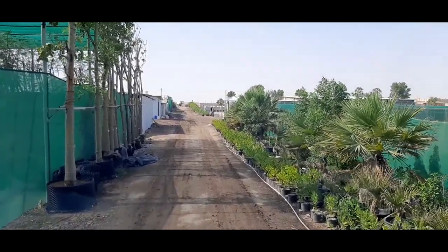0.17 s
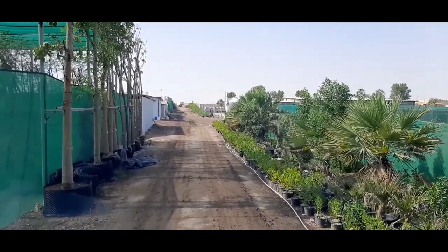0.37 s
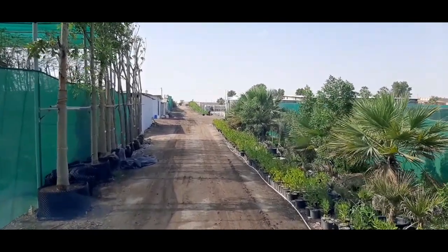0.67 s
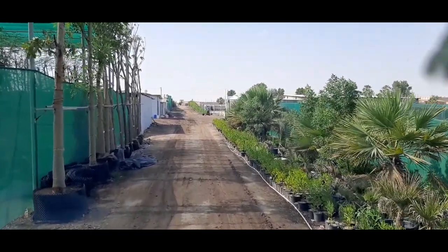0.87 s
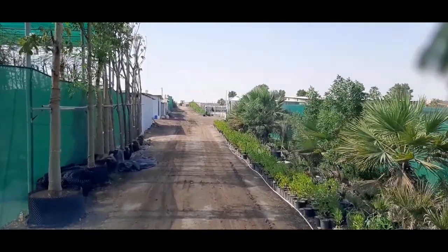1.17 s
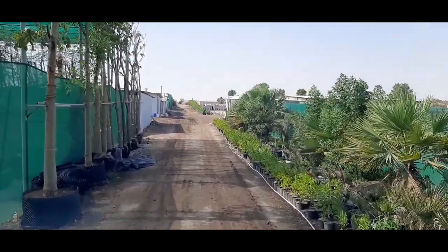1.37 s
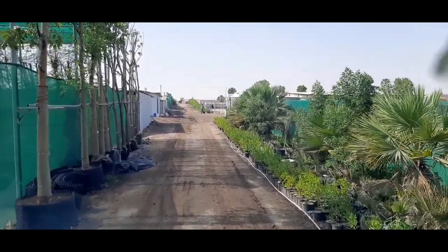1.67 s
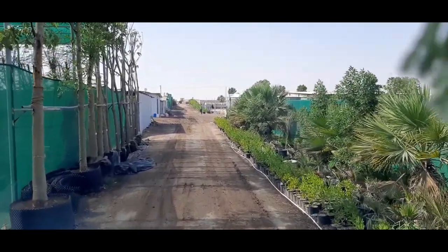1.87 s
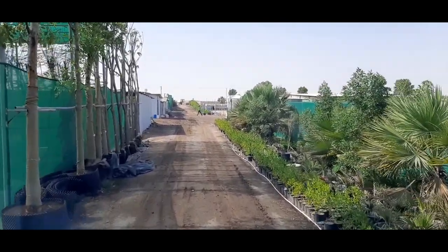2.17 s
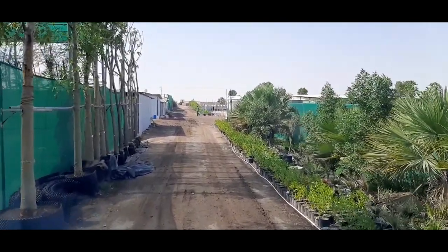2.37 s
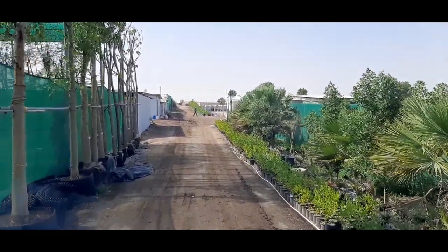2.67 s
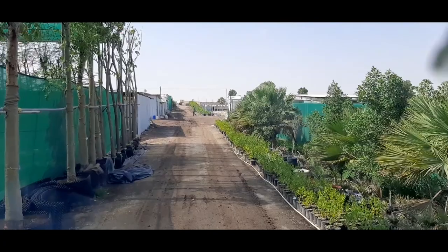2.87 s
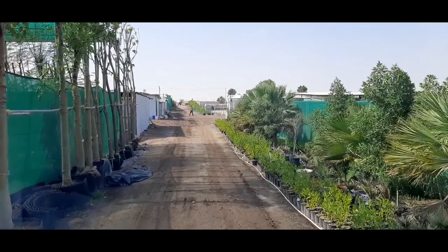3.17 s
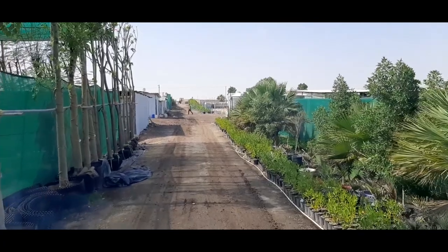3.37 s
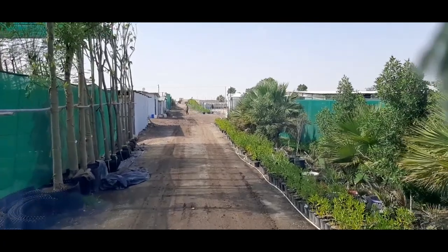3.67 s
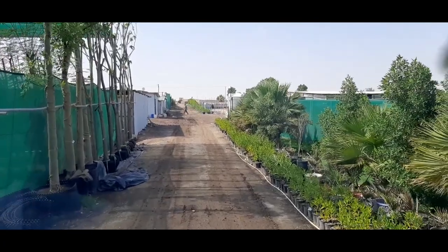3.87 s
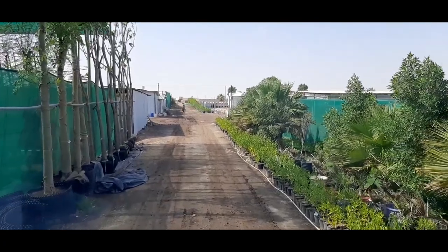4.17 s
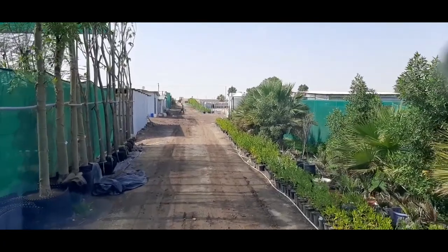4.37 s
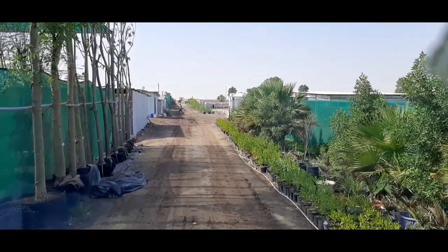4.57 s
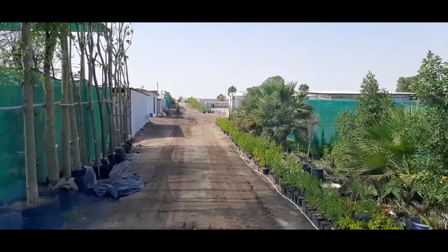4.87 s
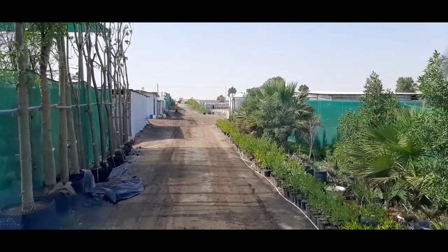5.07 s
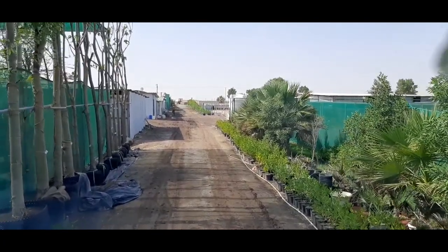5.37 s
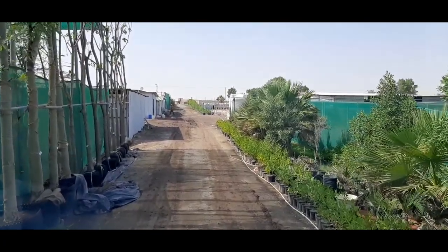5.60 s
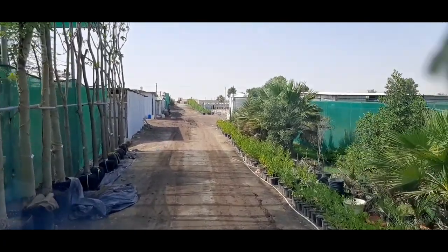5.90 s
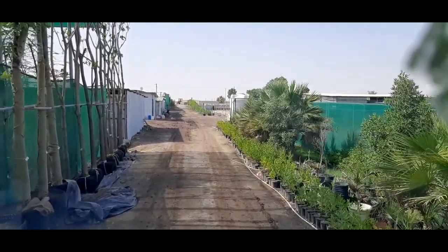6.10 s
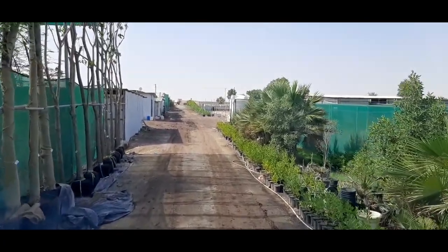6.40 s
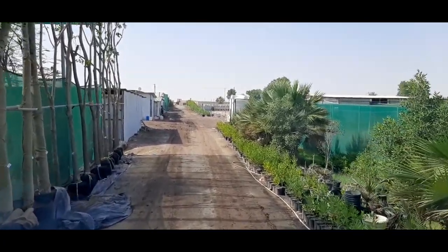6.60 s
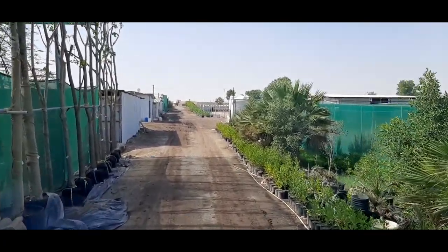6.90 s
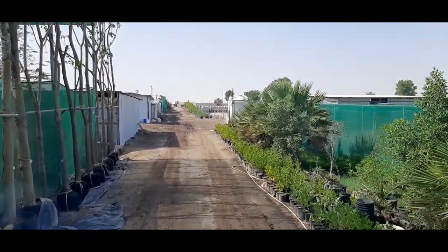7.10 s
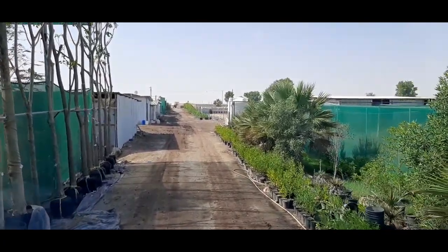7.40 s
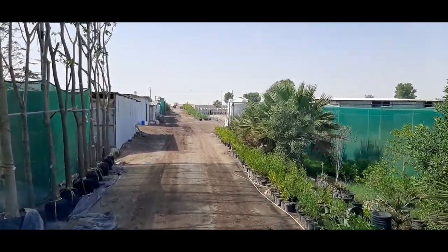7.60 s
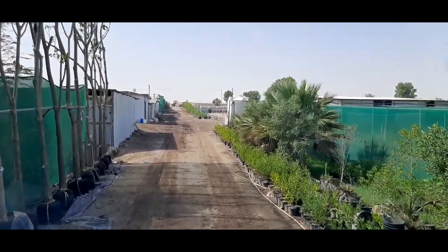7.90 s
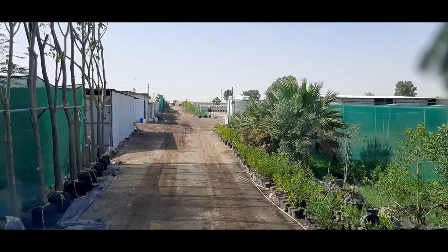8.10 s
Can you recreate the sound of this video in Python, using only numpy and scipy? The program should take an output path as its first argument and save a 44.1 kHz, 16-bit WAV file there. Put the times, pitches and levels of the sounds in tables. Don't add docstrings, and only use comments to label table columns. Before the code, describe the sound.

Heard in stereo from inside the cab of a heavy diesel truck moving slowly along a rough dirt track on a plant farm. A thick, humming engine drone of many steady low tones runs throughout, over boomy tyre rumble and a muffled combustion roar. From 0 to 2 s the engine coasts, wavering slightly, with a small rut at the start, a plastic tap at 0.4 s and light trim chatter leaning right. At about 2.0 s a big bump throws the load: rapid, hard dull thuds with hollow plastic taps and bright metal tinks. Rattling continues, and a second cluster of knocks lands near 3.6 s, with plastic taps just before 4 s. Around 4.7 s the engine begins pulling and its pitch rises a little. After 5 s the rattles are thinner, with faint knocks near 6 and 6.9 s, and the drone climbs gradually to the end at about 8 s.

```python
import sys
import numpy as np
from scipy import signal
from scipy.io import wavfile
from scipy.ndimage import uniform_filter1d

SR = 44100
rng = np.random.default_rng(int(sys.argv[2]) if len(sys.argv) > 2 else 0)


def voltage_ratio(decibels):
    exponent = np.asarray(decibels, float) / 20
    return 10 ** exponent


def output_pcm(signal):
    pcm = np.clip(np.atleast_2d(signal).T, -1, 1) * 32767
    wavfile.write(sys.argv[1], SR, np.round(pcm).astype(np.int16))


N = 363825
T = np.arange(N) / SR
CALM_DB = -58.5

# pitch_hz, likeness (0-1), left_lead (radians), left_over_right_db
PORTS = [(45, .93, -1.05, 3.3), (85, .9, -.4, 3.8), (110, .96, -.75, 2.6), (190, .95, -.45, .8),
         (300, .35, -.5, -1), (560, .4, .2, 2.4), (800, .4, 2.2, 1.5), (1200, .5, 3.3, .6),
         (2000, .4, 2.0, 1.8), (3500, .35, 1.6, .5), (9000, .3, 1.6, -4.9), (15000, .3, 1.6, -5.1)]
# pitch_ratio (times the main ring), level_db
BOX = [(.6, -10), (1, 0), (1.1, -9), (1.36, -2), (1.58, -6), (2.15, -8), (2.7, -15)]


def evened(x):
    return x / np.sqrt(np.mean(x ** 2) + 1e-20)


def read(points, hz, axis=1):
    columns = np.transpose(points)
    return np.interp(np.log(hz + 1), np.log(columns[0] + 1), columns[axis])


def curve(rows, axis=1):
    columns = np.transpose(rows)
    return np.interp(T, columns[0], columns[axis])


def drift(top_hz):
    t = T[::256]
    rates = np.geomspace(top_hz / 10, top_hz, num=16)[:, None]
    waves = np.sin(2 * np.pi * (rates * t + rng.random((16, 1))))
    return np.interp(T, t, evened(waves.sum(0)))


def ports(hz):
    half_level = voltage_ratio(read(PORTS, hz, axis=3) / 2)
    half_turn = np.exp(.5j * read(PORTS, hz, axis=2))
    left = half_level * half_turn
    return np.array([left, 1 / left])


def noise(spectrum, patchy_db, size, modes=()):
    frames, hz = 4 * N // size + 5, np.fft.rfftfreq(size, 1 / SR)
    a, b, c, d, patches = rng.standard_normal((frames, len(hz), 5)).T
    patches = uniform_filter1d(patches, size=9, axis=0)
    patches = evened(uniform_filter1d(patches, size=9, axis=1))
    same = np.clip(read(PORTS, hz), 0, 1)[:, None]
    left = a + 1j * b
    right = same * left + np.sqrt(1 - same ** 2) * (c + 1j * d)
    z = np.array([left, right]) * ports(hz)[:, :, None]
    colour_db = read(spectrum, hz)
    for mode_hz, width_hz, db in modes:
        colour_db = colour_db + db / (1 + (2 * (hz - mode_hz) / width_hz) ** 2)
    z *= voltage_ratio(colour_db[:, None] + patchy_db * patches)
    out = signal.istft(z, nperseg=size, noverlap=3 * size // 4)[1][:, :N]
    return out / np.sqrt(np.mean(out.mean(0) ** 2))


def hits(rows, ratios, detune, crack):
    out, t = np.zeros((2, N + SR)), np.arange(SR // 5) / SR
    ratio, mode_db = np.transpose(ratios)[:, :, None]
    draws = rng.uniform(-1.47, 1, (len(rows), 3, len(ratios), 1))
    for (start_s, db, hz, t60, *pan), (tune, *turn) in zip(rows, draws):
        modes_hz = hz * ratio * (1 + detune * tune * (ratio != 1))
        waves = np.sin(2 * np.pi * (modes_hz * t + .1 * np.array(turn)))
        ring = (voltage_ratio(mode_db) * waves).sum(1)
        b, a = signal.butter(2, [hz / 1.6, min(hz * 1.5, 15000)], "band", fs=SR)
        burst = evened(signal.lfilter(b, a, rng.standard_normal((2, len(t)))))
        burst = burst * voltage_ratio(-60 * 0.17 * t / t60)
        fade = voltage_ratio(db - 60 * t / t60) * np.minimum(t / .0005, 1)
        blow = (ring + crack * burst) * fade
        at = round(start_s * SR)
        out[:, at:at + len(t)] += blow * voltage_ratio([[sum(pan) / 2], [-sum(pan) / 2]])
    return out[:, :N]


def ruts():
    # middle_s, lift_db, half_length_s
    deep = [
        (0.0, 4.5, 0.098),
        (1.946, 5.5, 0.2),
        (3.71, 3, 0.18),
        (4.76, 2, .25),
        (8.25, -6, 0.18),
    ]
    return sum(db * np.exp(-((T - middle_s) / half_s) ** 2) for middle_s, db, half_s in deep)


def shaking():
    # start_s, length_s, level_db
    jolts = [(.0, 0.28, -53.5), (0.28, 0.046, -54), (0.547, 0.29, -54.5), (0.861, 0.025, -52.5),
             (0.977, 0.15, -51.5), (1.223, 0.17, -49), (1.448, 0.61, -51), (1.95, 0.062, -48),
             (2.075, 0.017, -42), (2.217, 0.16, -50.5), (2.414, 0.054, -50.5), (2.5, 0.19, -52),
             (2.77, 0.064, -50.5), (2.92, 0.13, -50.5), (3.154, 0.12, -51), (3.351, 0.55, -50.5),
             (3.826, 0.39, -50), (4.27, 0.088, -51), (4.392, 0.26, -50), (4.694, .04, -53),
             (4.79, 0.031, -52.5), (4.866, 0.26, -50.5), (5.29, 0.19, -55), (5.67, 0.06, -50),
             (5.88, 0.13, -51), (6.212, 0.15, -53), (6.436, 0.11, -52), (6.643, 0.14, -53.5),
             (7.25, 0.16, -52.5), (7.68, 0.42, -53)]
    start, length, db = np.transpose(jolts)[:, :, None]
    rise_s, fall_s = .01, 0.024
    t = T[::64]
    rise = np.clip((t - start) / rise_s + .5, 0, 1)
    fall = np.exp(-np.maximum(t - start - length, 0) / fall_s)
    return np.interp(T, t, CALM_DB + ((db - CALM_DB) * rise * fall).max(0))


def cycle():
    # time_s, firing_hz
    speed = [(0, 44.8), (.5, 43.9), (.9, 43.5), (1.2, 44.1), (1.55, 43.15), (2.05, 44.6), (2.5, 44.0),
             (3.0, 44.4), (3.5, 43.45), (3.8, 44.2), (4.2, 44.15), (4.95, 46.35), (5.2, 46.2), (5.5, 45.65),
             (6.0, 46.05), (6.5, 47.45), (6.8, 47.4), (7.35, 49.7), (7.8, 49.7), (8.25, 51.4)]
    firing_hz = uniform_filter1d(curve(speed), size=SR // 4, mode="nearest")
    firing_hz = firing_hz * (1 + .0004 * drift(4.0))
    return 2 * np.pi * np.cumsum(firing_hz) / SR / 6


def drone(angle):
    # time_s, load (0 coasting, 1 pulling, 2 pulling faster), throttle_effort_db
    driving = [(0, .1, 1), (.6, .1, 1), (.95, .1, -7), (1.3, .1, -2), (1.75, .1, -10), (2.15, .1, 1.5),
               (2.55, .1, 0), (3.2, .07, -1), (3.5, .05, -5), (4.45, .15, 1), (4.75, 1.2, 3), (5.6, 1, -1),
               (6.0, .35, -1), (6.25, .55, 3), (6.7, 1.1, 4.5), (7.0, 1.3, 2), (7.3, 1.8, 2), (8.25, 2, -1)]
    main_orders = {6: (-44, -35.5, -36, .5), 12: (-25.5, -24, -25, 1.0), 14: (-32, -20.5, -26, .3),
                   16: (-31, -32, -31, -.3), 18: (-25.5, -27, -31, .5)}
    # order, coasting_db, pulling_db, pulling_faster_db
    weak_orders = [(5, -75, -72, -71), (7, -67, -63, -58), (8, -48, -51, -47), (9, -39, -32, -31),
                   (10, -42, -29, -30), (11, -49, -50, -50), (13, -36, -36, -27), (15, -31, -40, -38),
                   (17, -43, -54, -40), (19, -36, -54, -44), (20, -41, -47, -43), (21, -45, -43, -34),
                   (22, -50, -61, -51), (23, -42, -43, -50), (24, -39, -44, -52), (25, -62, -63, -65),
                   (26, -58, -66, -68), (27, -52, -61, -53), (28, -58, -57, -51), (29, -58, -70, -59),
                   (30, -47, -44, -69),
                   (32, -51, -62, -57), (33, -52, -53, -57), (34, -51, -47, -44), (36, -60, -62, -48),
                   (38, -52, -50, -55), (40, -51, -55, -53), (46, -54, -44, -54), (49, -52, -57, -62),
                   (60, -60, -54, -49), (66, -56, -49, -50), (68, -51, -57, -60), (70, -48, -57, -54),
                   (74, -60, -56, -56), (75, -53, -51, -48), (81, -46.5, -52, -54), (90, -52, -58, -62),
                   (92, -51, -56, -60), (86, -55, -50, -58)]
    load, effort_db = curve(driving), curve(driving, axis=2)
    levels = {}
    for order, (*db, share) in main_orders.items():
        levels[order] = np.interp(load, range(3), db) + share * effort_db + 1.2 * drift(3.0)
    levels[16] = levels[16] + 2.3 * ruts()
    for order, *db in weak_orders:
        levels[order] = np.interp(load, range(3), db) + 1.57 * drift(2.4)
    for order in range(31, 130):
        if order not in levels:
            levels[order] = -60 - .3 * max(order - 88, 0) + 2 * rng.standard_normal() + 3.5 * drift(2.0)
    step, out = 8, 0
    cycle_hz = 7.6
    for order, db in levels.items():
        lag = 2 * np.pi * rng.random() + .5 * drift(1.5)[::step]
        tone = voltage_ratio(db[::step] + 0.78) * np.exp(1j * (order * angle[::step] + lag))
        sway = np.exp(.17j * np.outer([1, -1], drift(1.5)[::step]))
        out = out + np.sqrt(2) * (ports(order * cycle_hz)[:, None] * sway * tone).real
    return signal.resample_poly(out, step, 1, axis=1, window=("kaiser", 10))[:, :N]


def rumble():
    # pitch_hz, level_db (per Hz)
    boom = [(22, -60), (33, -52), (45, -7), (65, -4), (80, 11.5), (105, 12.5), (135, 8), (165, 0.5),
            (200, -40), (260, -43), (420, -95)]
    return voltage_ratio(-26.5 + ruts()) * noise(boom, patchy_db=0.0, size=8192)


def roar(angle):
    # pitch_hz, level_db (per Hz)
    burning = [(110, -3.5), (180, 2), (200, -5.5), (227, -3.5), (358, -5), (402, -13), (650, -13.5),
               (712, -28.5), (832, -15), (1450, -23), (4000, -39.5), (5200, -51), (8800, -120)]
    # pitch_hz, width_hz, level_db
    panels = [(370.5, 15, 3.5), (539, 11, 7.5), (580, 9.4, -37), (660, 19, 13.5), (840, 5, 7),
              (970, 12, -8), (1207, 23, 11), (1980, 78, 7), (2457, 24, 12.5)]
    since_firing = 6 * angle / (2 * np.pi) % 1
    puffs = evened(1 + 0.18 * np.exp(-since_firing / 1.6))
    swell_db = 0.12 * uniform_filter1d(shaking() - CALM_DB, size=SR // 4)
    level = voltage_ratio(-33 + swell_db + 0.29 * drift(13.0))
    return level * puffs * noise(burning, patchy_db=1.37, modes=panels, size=2048)


def raps():
    # start_s, peak_db
    sharp = [(0.045, -46.5), (0.6234, -48), (0.6937, -45.5), (0.8743, -43), (0.9804, -43.5), (1.068, -42),
             (1.5529, -52.5), (1.9896, -40.5), (2.0764, -41.5), (2.2925, -49), (2.3217, -43),
             (2.4367, -39.5), (2.6234, -45), (2.733, -47.5), (2.9783, -44), (3.1736, -45), (3.222, -45.5),
             (3.4852, -41), (3.5753, -44), (3.8086, -46), (3.8836, -42.5), (3.918, -39.5), (4.0255, -39.5),
             (4.0847, -51), (4.167, -44), (4.258, -45), (4.304, -48), (4.3237, -41.5), (4.393, -44),
             (4.46, -45), (4.5156, -45.5), (4.6907, -48), (4.708, -45.5), (4.793, -45.5), (4.891, -42.5),
             (5.294, -44.5), (5.3403, -44.5), (5.3905, -44), (5.4224, -51.5), (5.481, -43), (5.549, -43),
             (5.6605, -45), (5.683, -46.5), (5.88, -44.5), (5.9604, -44.5), (6.0526, -46), (6.1997, -45),
             (6.4158, -49.5), (6.4344, -45.5), (6.4972, -42), (6.639, -46), (6.8362, -53.5), (7.455, -43.5),
             (7.4854, -43), (7.6866, -46), (7.7655, -42.5), (7.8317, -40.5), (7.953, -47), (8.0175, -46),
             (8.0581, -48)]
    start_s, db = np.transpose(sharp)
    train = np.zeros(N)
    train[np.round(start_s * SR).astype(int)] = voltage_ratio(db - 26)
    fall_s = 0.012
    return signal.lfilter([1], [1, -np.exp(-1 / (fall_s * SR))], uniform_filter1d(train, size=30) * 30)


def trim():
    # pitch_hz, level_db (per Hz)
    hiss = [(1650, 6), (2800, -11), (5450, -6.5), (6810, -8.5), (7540, -6), (8400, -9.5), (11300, -8),
            (13700, -10), (14900, -5), (15800, -11)]
    # pitch_hz, level_db (per Hz)
    heavy = [(500, -2.5), (900, 13.5), (1400, -6), (2500, -2.5), (3500, -13), (6000, -55)]
    # pitch_hz, width_hz, level_db
    panels = [(4340, 190, 5), (5360, 57, 4.5), (7570, 106, 5.5), (11040, 140, 6), (11750, 200, 1),
              (14700, 440, -2)]
    turns = np.cumsum(57 * (1 + 0.099 * drift(22.0))) / SR
    tap_levels = voltage_ratio(3.6 * np.clip(rng.standard_normal(N), -2, 2))
    taps = np.diff(np.floor(turns), prepend=0) * tap_levels
    taps = uniform_filter1d(taps, size=60) * 60
    fall_s = 0.016
    buzz = evened(1.6 + signal.lfilter([1], [1, -np.exp(-1 / (fall_s * SR))], taps))
    buzz = buzz / uniform_filter1d(buzz, size=SR // 10)
    shake = voltage_ratio(shaking() + 3.24) * buzz
    clack = voltage_ratio(0.35) * shake * noise(heavy, patchy_db=2.0, size=512)
    level = np.hypot(shake, raps()) + voltage_ratio(-68)
    return level * noise(hiss, patchy_db=1.5, modes=panels, size=1024) + clack


def plastic_taps():
    # start_s, peak_db, ring_hz, t60_s (time to fall 60 dB)
    taps = [(0.414, -32, 1160, 0.044), (1.2264, -52, 1360, 0.06), (1.9914, -29.5, 1746, 0.069),
            (2.1409, -27, 1650, 0.061), (2.1846, -35, 1620, 0.06), (2.487, -41, 1250, 0.065),
            (3.861, -39, 1230, 0.06), (3.904, -35, 1435, 0.081), (4.6504, -48, 1720, 0.06),
            (4.9402, -31, 1190, 0.054), (5.766, -48, 1230, 0.06), (6.0904, -51, 1130, 0.06),
            (6.8926, -55, 1190, 0.06), (7.993, -46, 1130, 0.06)]
    return voltage_ratio(-7.5) * hits(taps, BOX, detune=0.073, crack=0.25)


def metal_tinks():
    # start_s, peak_db, ring_hz, left_over_right_db
    tinks = [(0.6917, -53, 7500, -6), (0.7193, -42, 3490, 3), (0.7487, -40.5, 4340, 0),
             (1.043, -44, 2980, -2), (1.334, -47, 2660, 1), (1.356, -42, 3650, 0), (1.653, -43.5, 2800, 5),
             (1.801, -44, 4240, 4), (1.9903, -34, 6400, 1), (2.0534, -45, 3020, 2), (2.077, -35.5, 2700, 1),
             (2.1281, -44.5, 5730, 5), (2.1386, -43, 4000, 0), (2.2146, -42.5, 4230, 3),
             (3.4496, -43, 3420, 0), (3.606, -43, 2610, 0), (3.6252, -39, 2710, 5), (3.8838, -44, 3030, -2),
             (4.0272, -41, 3060, -5), (4.0846, -50, 5300, -2), (4.1064, -46, 4130, -4),
             (4.7074, -39, 6000, 3), (4.713, -45, 6340, 7), (5.179, -46, 3470, 6), (5.962, -47, 2770, -2),
             (6.6627, -41, 4420, 7), (7.345, -43.5, 2600, 3), (7.7648, -47, 3500, -3)]
    # pitch_ratio (times the main ring), level_db
    bracket = [(.57, -14), (.93, -5), (1, 0), (1.07, -4), (1.15, -5), (1.24, -4), (1.33, -6), (1.6, -10)]
    t60_s = 0.072
    rows = [(start_s, db, hz, t60_s, pan) for start_s, db, hz, pan in tinks]
    return voltage_ratio(-4.0) * hits(rows, bracket, detune=0.052, crack=1.7)


def load_thuds():
    # start_s, peak_db, ring_hz, t60_s (time to fall 60 dB)
    thuds = [(2.0525, -9, 490, 0.063), (2.059, -24, 510, 0.06), (2.0705, -10, 456, 0.059),
             (2.079, -8, 438, 0.051), (3.606, -26, 514, 0.046), (3.6115, -11, 510, 0.03),
             (3.624, -11.5, 487, 0.088), (3.63, -11, 469, 0.059), (3.644, -23, 430, .08),
             (4.52, -31, 573, .05), (4.651, -32, 607, .06), (4.697, -25, 600, 0.046),
             (5.019, -34, 410, .065), (5.961, -31, 670, 0.051), (1.2264, -34, 600, .05),
             (2.487, -27, 590, .05), (5.766, -33, 610, 0.04), (6.0904, -39, 616, .05),
             (6.8926, -26, 600, .05)]
    return voltage_ratio(-10.5) * hits(thuds, BOX, detune=0.02, crack=0.45)


def scene():
    angle = cycle()
    steady = drone(angle) + rumble() + roar(angle)
    return steady + trim() + plastic_taps() + metal_tinks() + load_thuds()


def roll_off(x):
    return signal.sosfilt(signal.butter(12, 15530, fs=SR, output="sos"), x)


def record(dry):
    bass_cut = signal.butter(2, 34.7, "high", fs=SR, output="sos")
    treble_cut = signal.firwin(511, 15450, window=("kaiser", 9), fs=SR)
    heard = signal.sosfilt(bass_cut, dry)
    heard = signal.oaconvolve(heard, treble_cut[None], "same")
    return roll_off(heard)


dry = scene()
out = record(dry)
output_pcm(out)
```